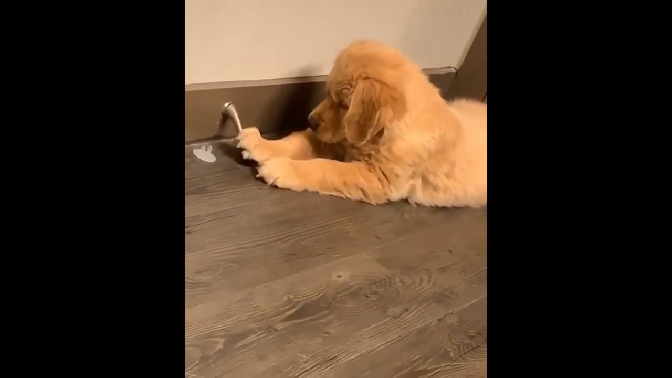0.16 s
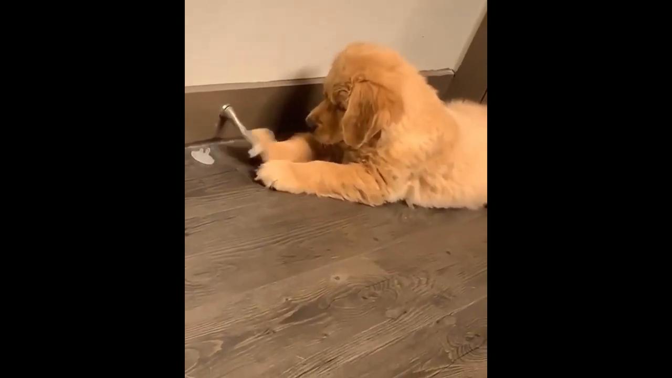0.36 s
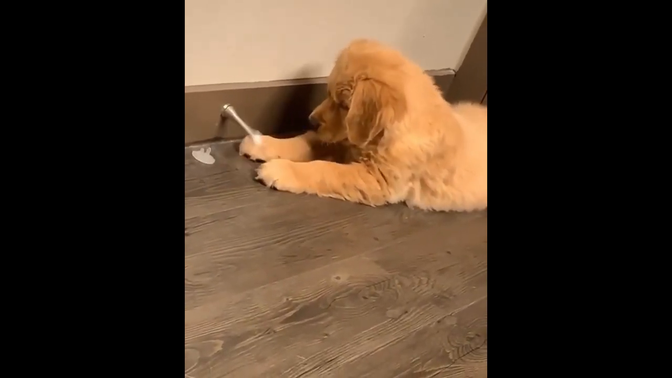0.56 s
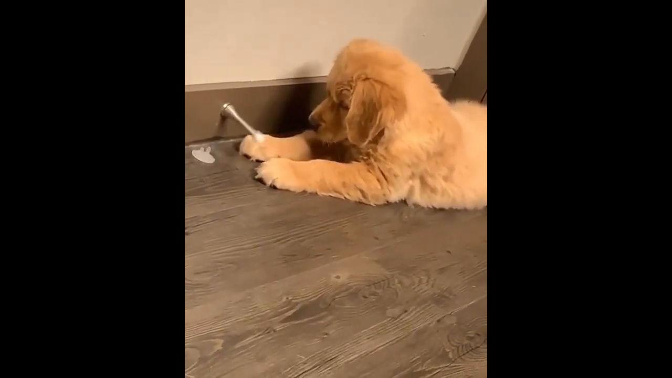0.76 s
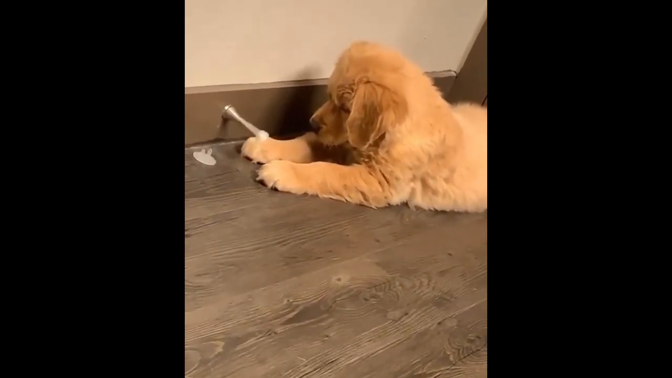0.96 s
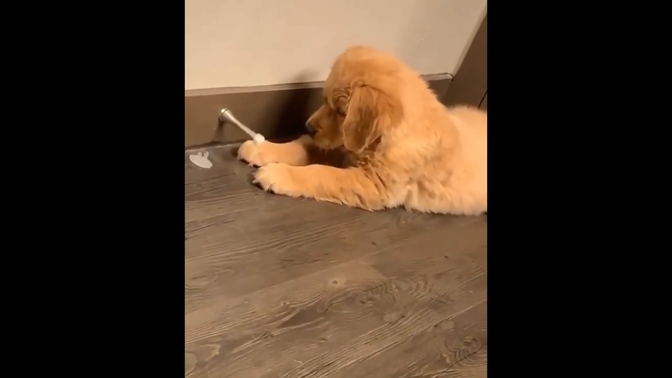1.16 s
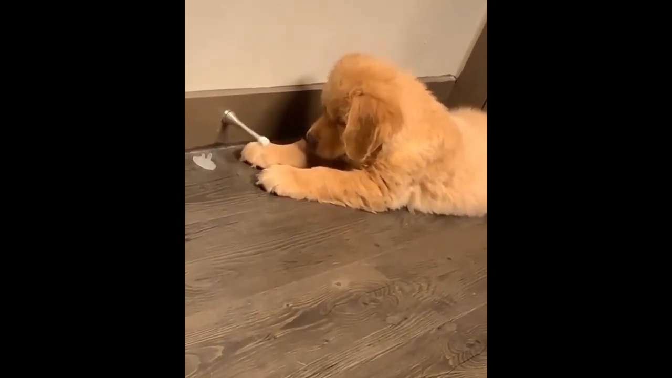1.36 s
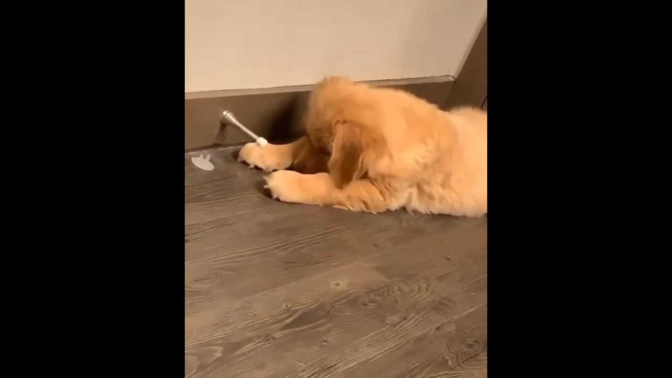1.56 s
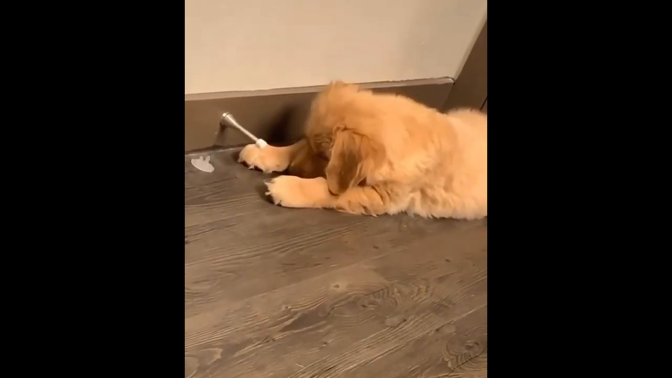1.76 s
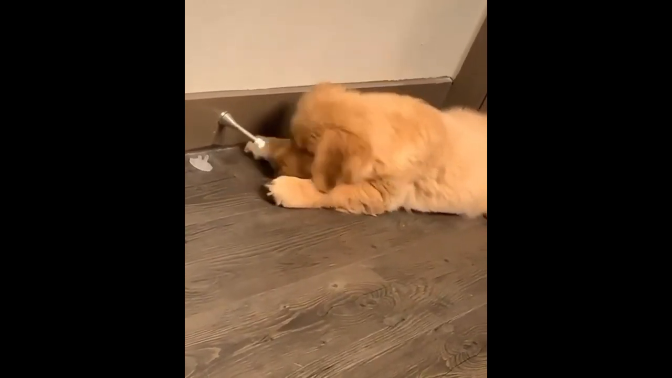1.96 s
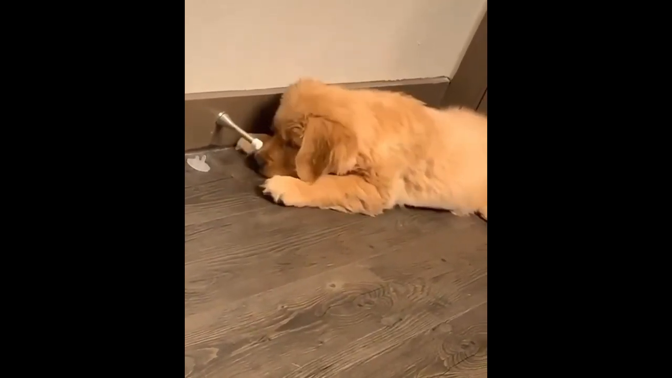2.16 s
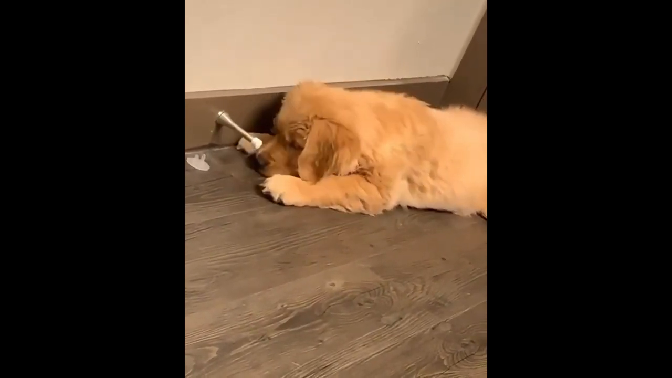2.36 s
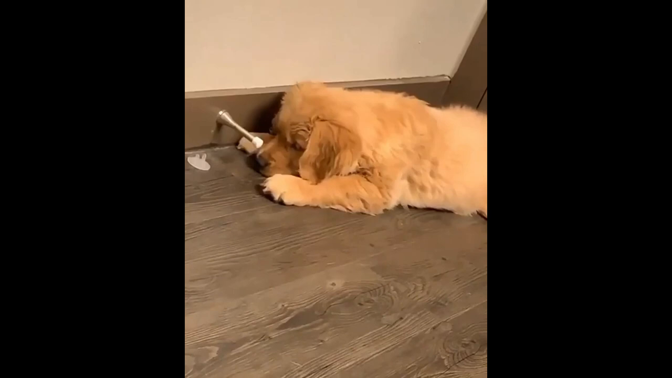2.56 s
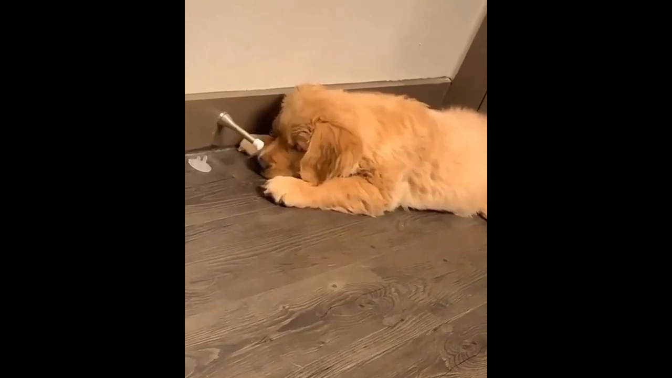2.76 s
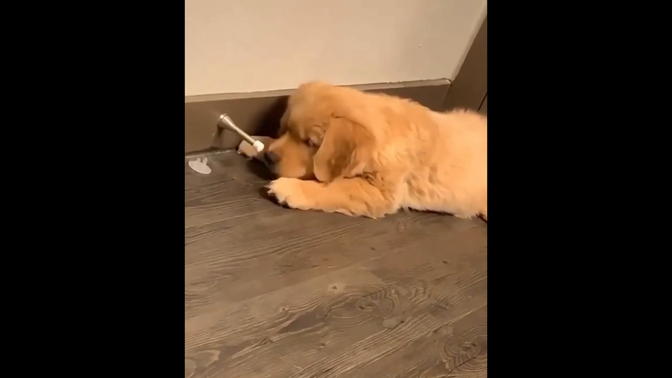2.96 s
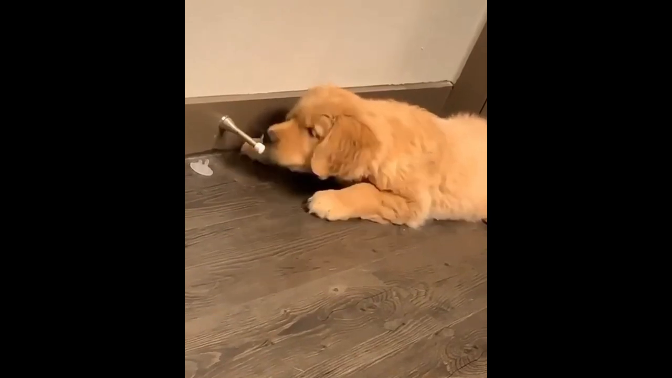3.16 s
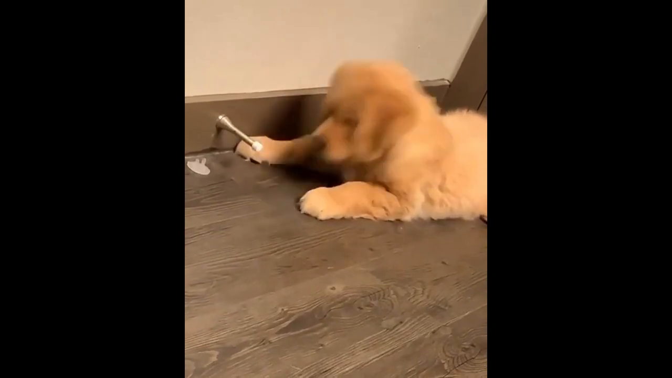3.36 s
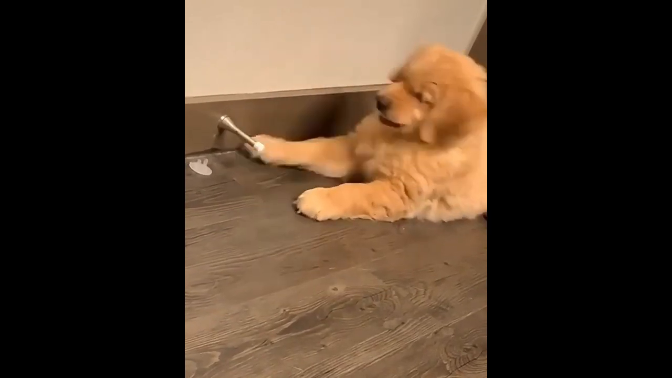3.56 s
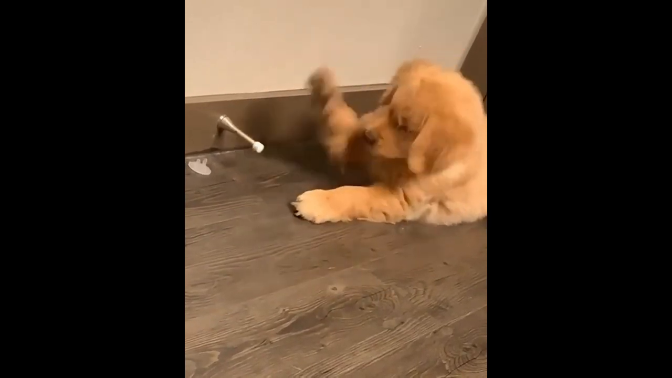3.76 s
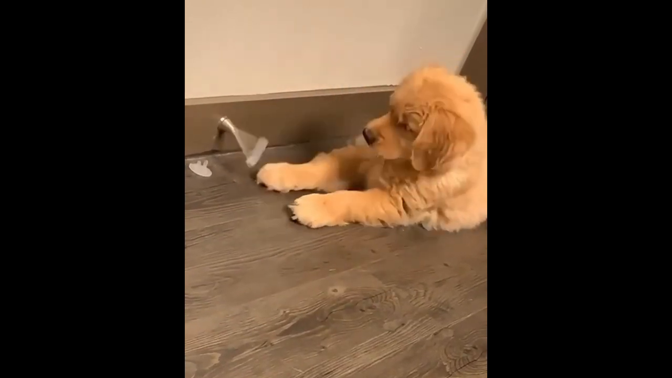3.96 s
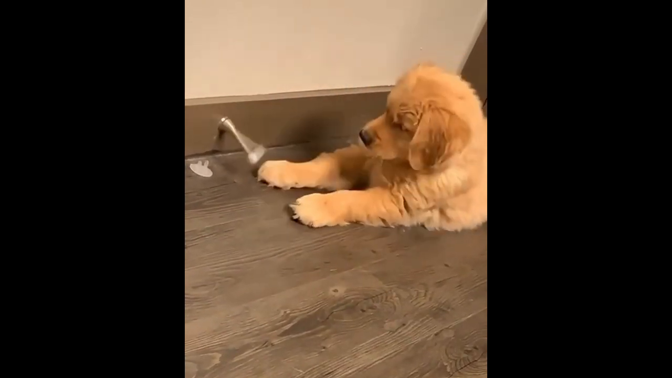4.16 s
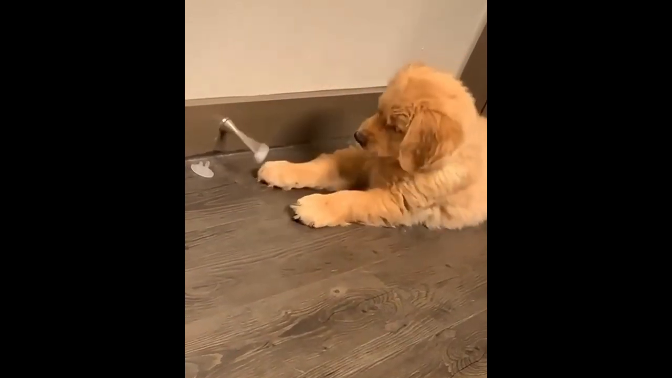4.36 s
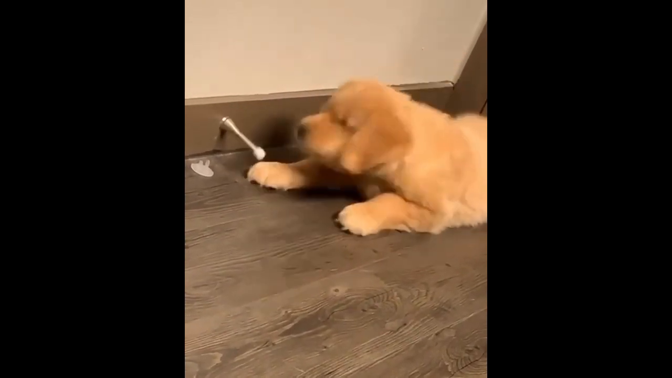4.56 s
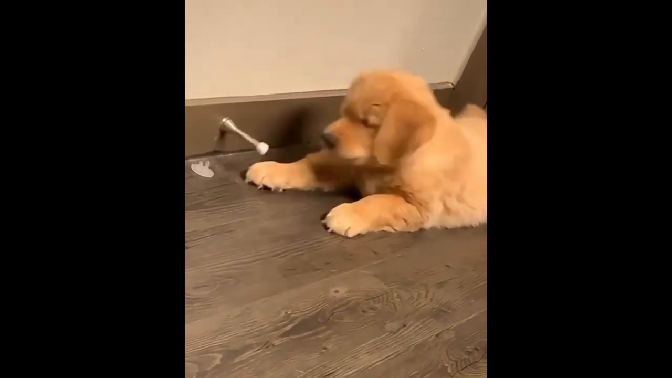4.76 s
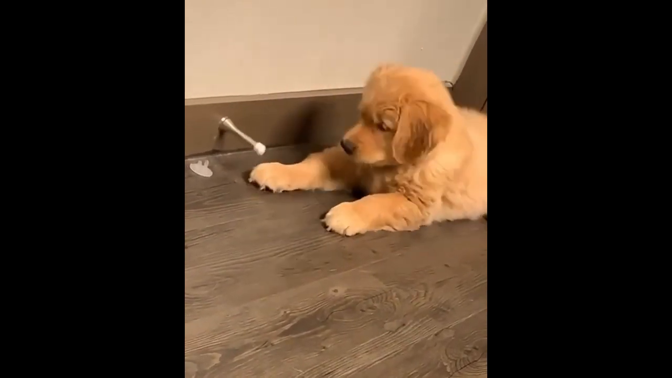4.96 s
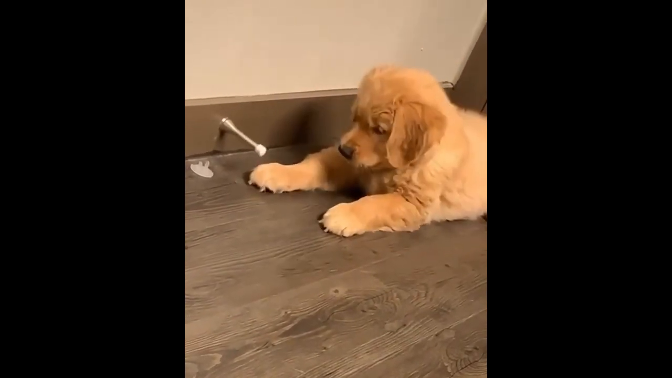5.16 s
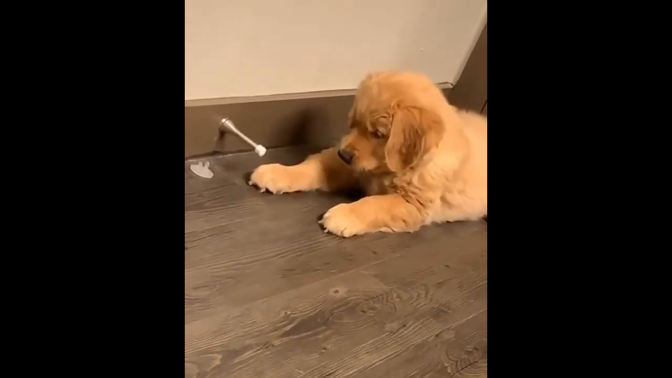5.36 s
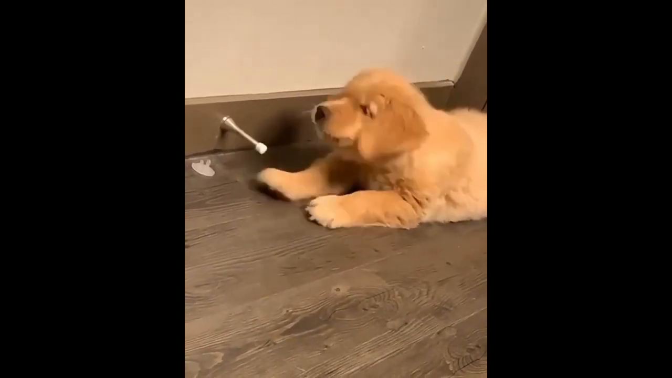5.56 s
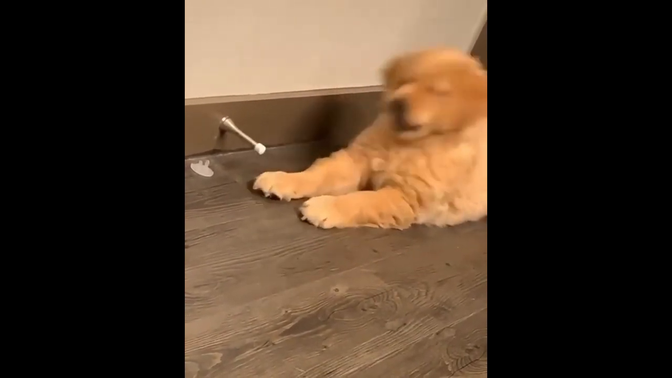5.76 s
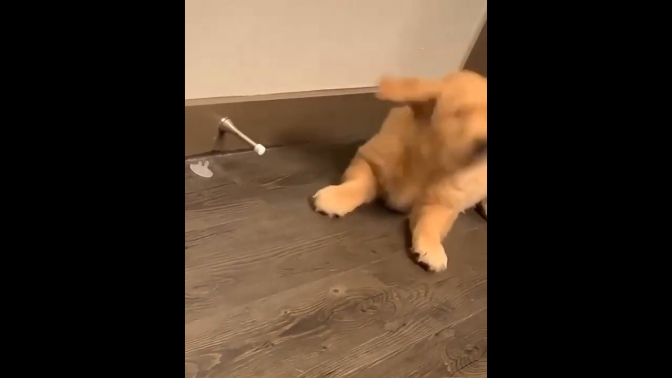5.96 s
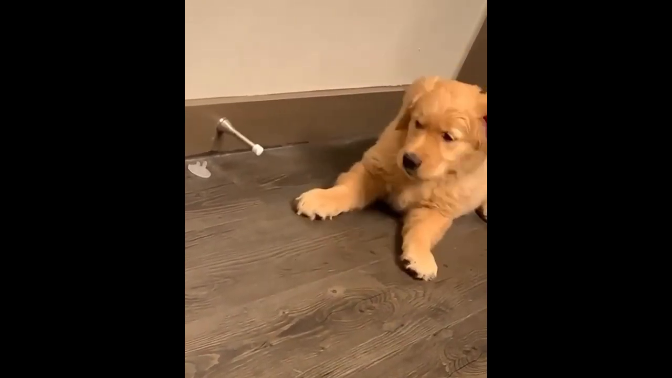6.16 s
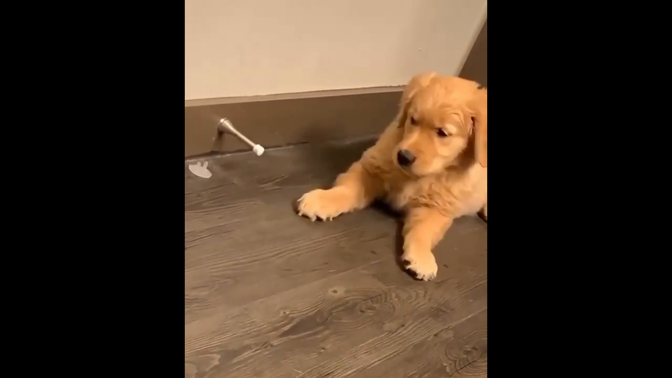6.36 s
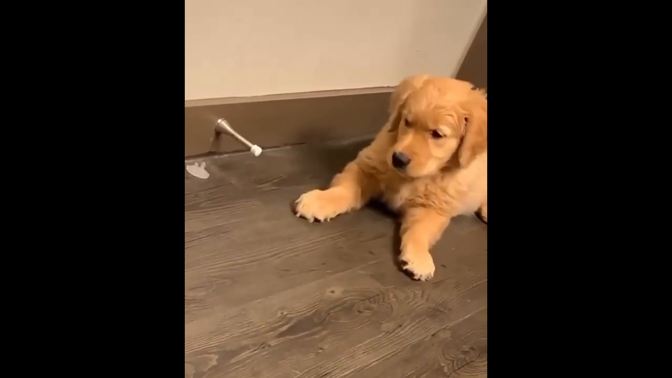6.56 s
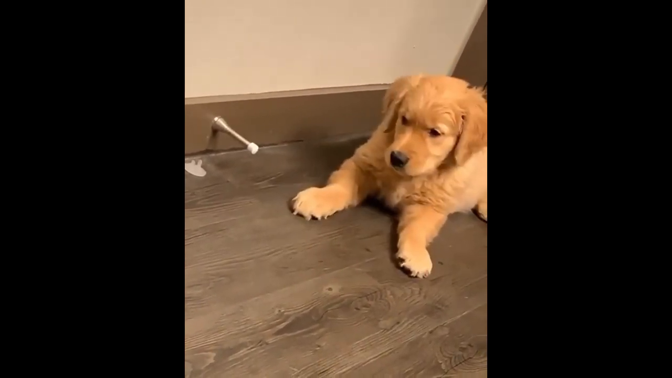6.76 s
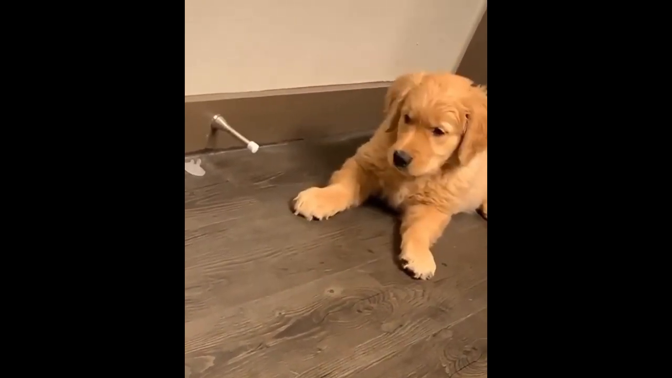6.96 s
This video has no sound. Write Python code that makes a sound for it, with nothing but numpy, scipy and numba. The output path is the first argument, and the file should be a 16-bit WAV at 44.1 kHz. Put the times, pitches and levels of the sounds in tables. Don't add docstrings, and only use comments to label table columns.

```python
import sys
import numpy as np
from scipy import signal
from scipy.fft import rfft, irfft
from scipy.io import wavfile
from scipy.ndimage import uniform_filter1d
from numba import njit

SR = 44100
rng = np.random.default_rng(int(sys.argv[2]) if len(sys.argv) > 2 else 0)


def convert_level_to_amplitude(level_db):
    exponent = np.asarray(level_db, float) / 20
    return 10 ** exponent


def log_audio(samples):
    frames = np.atleast_2d(samples).T
    limited = np.clip(frames, -1, 1)
    pcm = np.round(limited * 32767).astype(np.int16)
    wavfile.write(sys.argv[1], SR, pcm)


N = 308567

# start in
# seconds, peak in dB, treble in dB over the peak.
SLAPS = [(0.335, -50, -5), (0.374, -7.5, -38), (0.446, -10, -45), (0.67, -7.5, -29), (0.848, -29, -43),
         (1.009, -17.5, -27), (1.247, -21.5, -31), (1.361, -29, -20.5), (1.468, -30, -24),
         (1.569, -31.5, -26), (3.817, -33, -19), (3.87, -3.5, -38), (3.907, -5.5, -42), (3.95, -1, -23),
         (3.99, -10, -38), (4.041, -4.5, -33), (4.11, -9.5, -26), (4.376, -23, -25), (4.405, -22, -26),
         (4.443, -12, -40), (4.467, -11, -32), (4.525, -17, -30), (4.701, -14.5, -23), (4.739, -17, -26.5),
         (4.856, -19.5, -40), (4.899, -25.5, -34), (4.998, -24.5, -28), (5.109, -30, -30),
         (5.198, -36.5, -18), (5.468, -29, -24)]
# time in seconds, size of the swing in dB.
FLICKS = [
    [(0.372, -36.5), (1.2, -39.5), (1.57, -42), (1.97, -49), (2.14, -64), (2.3, -69)],
    [(3.868, -41), (4.34, -43), (4.7, -39), (5.07, -40), (5.39, -45), (5.56, -60), (5.72, -66)],
]
# start in seconds, rattle in dB, rise in seconds, hold in seconds, deep hum in dB.
CHATTERS = [(.38, -26.5, .004, .06, -38), (.645, -35, 0.011, .015, -28), (.676, -22, .004, .02, -29),
            (.83, -28, .025, .05, -43), (1.008, -33, .008, 0.026, -28.5), (1.247, -34, .004, .05, -25.5),
            (1.473, -44, 0.036, 0.018, -46), (3.826, -48, .008, .04, -36.5), (3.873, -21, .003, .1, -32.5),
            (3.994, -22.5, 0.033, .17, -27), (4.454, -26, 0.098, 0.023, -36.5),
            (4.503, -23, .04, 0.011, -35), (4.727, -28.5, .05, 0.022, -32),
            (4.905, -36.5, 0.057, 0.014, -37.5), (5.058, -43.5, 0.064, 0.024, -32.5),
            (5.394, -51.5, .05, .05, -48), (5.476, -44, .01, 0.014, -50.5)]
# centre in Hz, width in Hz, level in dB.
BOARD_DEEP = [
    (181.7, 11.4, 1),
    (207.8, 25, -5),
]
BOARD_LOW = [(280, 32, -1), (320.2, 26.7, -2), (341.4, 28, -6), (398.4, 45, -9.5)]
# centre in Hz, width in Hz, level in dB over the broad clatter.
BOARD_HIGH = [(577, 72, -1.5), (790.4, 32, 1), (946, 89, -5), (1084, 36, 0.5), (1206, 41, -5),
              (1345, 31, -7.5), (1792, 35, -4.5)]
# frequency in Hz, gain in dB.
CLATTER_COLOUR = [(200, -21.5), (450, -16), (800, -1), (1300, -.5), (1900, -5.5), (2600, -15), (3600, -19),
                  (5000, -27), (14000, -63.5)]
# frequency in Hz, gain in dB.
STEEL_COLOUR = [(2500, -10), (4500, -2), (7500, 0), (10500, -5), (12500, -13), (14000, -30)]


def door_stop():
    ticks = level(rng.standard_normal(N) * convert_level_to_amplitude(2.15 * rng.exponential(size=N)), 0)
    other_ticks = ticks[::-1]

    t = np.arange(int(0.2 * SR)) / SR
    slap = np.exp(-t / 0.02) + 0.51 * np.exp(-t / 0.0023)
    bursts = np.zeros((3, N))
    for s, db, treble_db in SLAPS:
        i = int(s * SR)
        thump_db = -17.5 + 0.65 * db
        bursts[:, i:i + len(t)] += convert_level_to_amplitude([[db], [db + treble_db], [thump_db]]) * slap
    slap_high, slap_treble, slap_thump = bursts

    swing = convert_level_to_amplitude(curves(FLICKS)[0])
    chatter = swells([(s, db, rise, hold, 0.1) for s, db, rise, hold, _ in CHATTERS])
    chatter_hum = swells([(s, db, rise, hold, 0.13) for s, db, rise, hold, _ in CHATTERS])
    chatter_deep = swells([(s - 0.016, deep_db, rise, hold, 0.24) for s, _, rise, hold, deep_db in CHATTERS])
    rattle = swing + chatter
    hum = convert_level_to_amplitude(1.5) * swing + convert_level_to_amplitude(-11.0) * chatter_hum
    deep = convert_level_to_amplitude(-4.5) * swing + chatter_deep

    swing_hz = 25.97
    knock, size, phase = pulses(np.full(N, swing_hz), 0.1 * walk(9), scatter_db=1.5)
    gate = size * (0.5 + np.exp(-(2 * phase % 1) / 0.33))

    high = (convert_level_to_amplitude(-5.0) * slap_high + convert_level_to_amplitude(3.0) * rattle * gate) * ticks
    treble = (convert_level_to_amplitude(-7.0) * slap_treble + convert_level_to_amplitude(-23.5) * rattle ** 0.94 * gate) * other_ticks
    thump = convert_level_to_amplitude(12.0) * slap_thump * ticks
    shake = convert_level_to_amplitude(40.5) * knock + convert_level_to_amplitude(19.0) * gate * ticks
    low = body(thump + convert_level_to_amplitude(1.0) * deep * shake, BOARD_DEEP)
    low = low + body(thump + convert_level_to_amplitude(-2.5) * hum * shake, BOARD_LOW)

    clatter = shaped(high + body(high, BOARD_HIGH), CLATTER_COLOUR)
    boom = shaped(low, [(60, -32.5), (125, -8.0), (165, 0.5), (380, 0.5), (500, -5.5), (1000, -38.0)])
    return clatter + boom + shaped(treble, STEEL_COLOUR)


# time in seconds, pitch in Hz, level in dB, roughness from 0 to 1.
YAP = [(5.762, 982, -47.5, 0.52), (5.778, 984.5, -13, 0.37), (5.79, 962.2, -6, .28), (5.82, 882, -4, 0.3),
       (5.85, 825.1, -4, .5), (5.89, 763.5, -4, .5), (5.94, 741.7, -4, 0.5), (5.995, 747.6, -6, 0.39),
       (6.008, 730, -36, 0.4)]
# start in seconds, level in dB, rise, hold and fall in seconds.
PUSH = (5.795, -29, .016, .04, .11)
# frequency in Hz, gain in dB.
THROAT = [(260, -36), (400, -13), (640, -6), (950, -2.5), (1250, -6.5), (1750, -10), (2050, -19.5),
          (2300, -14), (2650, -17.5), (3150, -17), (4200, -31.5), (4700, -50), (7000, -47), (13000, -66)]
# frequency in Hz, gain in dB.
TEETH = [(4500, -31), (6500, -15.5), (8000, 4), (10000, -1), (12500, -14), (14000, -28.5)]


def yap(count=8):
    hz, db, rough = curves([YAP])
    push = swells([PUSH])
    rough = np.clip(rough, 0, 1)
    _, size, phase = pulses(hz, 0.16 * rough * walk(250), scatter_db=3.0)
    partials = sum(np.cos(2 * np.pi * (k + 1) * phase) for k in range(count))
    folds = uniform_filter1d(size, size=30) * partials
    throb = 1 + 0.33 * np.cos(2 * np.pi * phase / 10.5 + 1.7 * walk(40))
    breath = 5.0 * rough * (1 + np.cos(2 * np.pi * phase)) * rng.standard_normal(N)
    source = throb * (folds + breath)

    voice = shaped(convert_level_to_amplitude(db - 0.5) * source, THROAT)
    gape = band(band(convert_level_to_amplitude(21.0) * push * source, 3150.0, 400.0), 3150.0, 730.0)
    hiss = push * convert_level_to_amplitude(3.0 * walk(120)) * coloured(TEETH)
    return voice + shaped(gape, [(4100, 0), (4600, -14)]) + hiss


# frequency in Hz, level in dB, time to fall 60 dB in seconds.
RINGING = [(730, 2.5, 0.46), (786, -3.5, 0.62), (846.6, 1, 0.49), (853, -3.5, .55), (896, 1, 0.63),
           (940, -8.5, 0.35), (1018, -8, 0.8), (1103, -7, 0.48), (1235, -2, .45), (1464, -10, 0.49),
           (1720, -1, 0.55), (1752, 0.5, 0.45), (2285, 0, 0.39), (3045, -3.5, 0.31)]


def ringing(bark):
    modes = []
    for hz, db, t60 in RINGING:
        width = np.log(1000) / np.pi / t60
        modes.append((hz, width, db + 13.0))
    return body(bark, modes)


# time in seconds, pulse rate in Hz, level in dB, mouth opening from 0 to 1.
GRUNTS = [
    [(5.468, 400, -46.5, 1), (5.505, 383.5, -40, 1), (5.58, 392, -54, 1), (5.69, 371, -56, 1)],
    [(5.71, 96.5, -40.5, 0.1), (5.735, 98.3, -23.5, 0.05), (5.77, 103.5, -17.5, 0), (5.82, 110.2, -12, 0),
     (5.87, 188, -31.5, 0.06), (5.93, 237, -31, 0.08), (5.97, 241.4, -50.5, 0)],
]


def grunts():
    hz, db, opening = curves(GRUNTS)
    pulse = convert_level_to_amplitude(db + 40.5) * pulses(hz, 0.066 * walk(60), scatter_db=0.5)[0]
    opening = opening.clip(0, 1)
    whimper = body(pulse * opening, [(400, 120, -3), (870, 89, -6), (1150, 110, -7), (1966, 450, -28)])
    whimper = shaped(whimper, [(1250, 0), (1600, -10), (5000, -12)])
    growl = shaped(pulse * (1 - opening), [(100, -37.5), (150, -20.5), (200, -7.5), (290, -8.0),
                                           (420, -8.5), (650, -49.0), (3000, -77.5)])
    return whimper + growl


# start in seconds, level in dB, rise, hold and fall in seconds.
SNIFFS = [(1.75, -75, .15, 0.092, .2), (1.96, -56.5, .15, 0.032, .15), (3.03, -65, 0.15, 0.027, 0.19),
          (3.37, -65.5, .1, 0.06, 0.054), (3.52, -65, .2, .05, 0.14), (5.43, -63, .04, .02, .05),
          (5.475, -54, .01, .04, .2)]
# frequency in Hz, gain in dB.
NOSE = [(880, -39), (1500, -5), (1970, -2.5), (2270, -0.5), (4770, -5), (7560, -7.5), (13000, -18.5)]


def sniffs():
    flutter = convert_level_to_amplitude(-2.5 + 2.2 * walk(50))
    return swells(SNIFFS) * flutter * coloured(NOSE)


# start in seconds, level in dB, time to fall 60 dB in seconds.
THUDS = [(.42, -47, 0.65), (.67, -48, .5), (3.4, -55, 1.4), (3.86, -43, .6), (4.45, -44, .5),
         (4.64, -43.5, .5), (5.471, -43, 0.33), (5.761, -51.5, .5)]


def paws():
    weight = np.zeros(N)
    t = np.arange(int(0.3 * SR)) / SR
    soft_start = np.clip(t / 0.037, 0, 1)
    for s, db, t60 in THUDS:
        weight[int(s * SR):][:len(t)] += convert_level_to_amplitude(db - 60 * t / t60) * soft_start
    return weight * coloured([(15, -7.5), (35, 4.5), (90, 5), (150, -14.0), (400, -37)])


# band centre in Hz, time to fall 60 dB in seconds.
ROOM = [(125, 0.72), (300, 0.62), (800, 0.6), (2000, 0.36), (5000, 0.58), (10000, 0.51)]


def room(x):
    t = np.arange(SR) / SR
    tail = sum(band(rng.standard_normal(SR), hz, 1.45 * hz) * convert_level_to_amplitude(-60 * t / t60) for hz, t60 in ROOM)
    tail = tail * np.clip(t / 0.0039, 0, 1)
    return signal.fftconvolve(x, tail / np.sqrt(np.sum(tail ** 2)))[:N]


# centre in Hz, width in Hz, level in dB.
HUMS = [
    (120.3, 2.5, -61),
    (467.3, 4.5, -65),
    (538, 9.7, -72.5),
    (606, 14, -74.5),
    (1200, 13, -80.5),
]
# start in seconds, level in dB, rise, hold and fall in seconds.
HUMS_ON = (0, 2, .1, 4, 1.5)
# start in seconds, level in dB, rise, hold and fall in seconds.
DRONE = [
    (0, -63, .1, 2.54, 0.56),
    (2.95, -58.5, .1, 0.42, .35),
]
# frequency in Hz, gain in dB.
VENTILATION = [(15, -12.5), (30, -4), (90, -2.5), (200, -14.5), (400, -12.5), (620, -25), (750, -20),
               (1300, -27), (3000, -33.5), (7000, -42.5), (13000, -52)]


def house():
    hums = [convert_level_to_amplitude(1.4 * walk(4.5)) * level(band(rng.standard_normal(N), hz, width), db) for hz, width, db in HUMS]
    mains, *upper = hums
    drone_hz = 218.0 + 2.0 * walk(6.1)
    drone = np.sin(2 * np.pi * np.cumsum(drone_hz) / SR)
    drone = swells(DRONE) * convert_level_to_amplitude(1.0 + 2.0 * walk(8.93)) * drone
    air = convert_level_to_amplitude(-58.5 + 0.6 * walk(1.2)) * coloured(VENTILATION)
    return air + mains + swells([HUMS_ON]) * sum(upper) + drone


def level(x, db):
    return x * convert_level_to_amplitude(db) / np.sqrt(np.mean(x ** 2))


def curves(tables, rest_db=-120):
    t = np.arange(N) / SR
    out = np.full((len(tables[0][0]) - 1, N), float(rest_db))
    for table in tables:
        s, *columns = np.transpose(table)
        on = (t >= s[0]) & (t <= s[-1])
        out[:, on] = [np.interp(t[on], s, c) for c in columns]
    return out


def swells(rows):
    t = np.arange(0, N / SR, 1 / 1000)
    total = np.zeros(len(t))
    for s, db, rise, hold, fall in rows:
        before = (s - t) / max(rise, 1e-3)
        after = (t - s - hold) / max(fall, 1e-3)
        total += convert_level_to_amplitude(db - 20 * np.maximum(before, after).clip(0, 9))
    return np.interp(np.arange(N) / SR, t, total)


def walk(rate):
    k = int(SR / rate)
    steps = np.repeat(rng.standard_normal(N // k + 1), k)
    return 1.3 * uniform_filter1d(uniform_filter1d(steps, k), k)[:N]


def pulses(hz, jitter, scatter_db):
    phase = np.cumsum(np.maximum(hz, 0) * (1 + jitter)) / SR
    size = convert_level_to_amplitude(scatter_db * rng.standard_normal(N // 20))[phase.astype(int)]
    return size * np.diff(np.floor(phase), prepend=0), size, phase


def band(x, hz, width):
    return signal.lfilter(*signal.iirpeak(hz, hz / width, SR), x)


def body(x, modes):
    return sum(convert_level_to_amplitude(db) * band(x, hz, width) for hz, width, db in modes)


def shaped(x, points, size=16384):
    hz, db = np.transpose(points)
    grid_hz = np.maximum(np.arange(size // 2 + 1) * SR / size, 1)
    cepstrum = irfft(np.interp(np.log(grid_hz), np.log(hz), db) * np.log(10) / 20)
    cepstrum[1:size // 2] *= 2
    cepstrum[size // 2 + 1:] = 0
    return signal.oaconvolve(x, irfft(np.exp(rfft(cepstrum)))[:size // 2])[:len(x)]


def coloured(points):
    return level(shaped(rng.standard_normal(N), points), 0)


def scene():
    bark = yap()
    near = door_stop() + grunts()
    echoes = convert_level_to_amplitude(-3.0) * room(near + convert_level_to_amplitude(-3.0) * bark)
    mix = near + echoes + convert_level_to_amplitude(-2.5) * bark + ringing(bark)
    return (mix + paws() + sniffs() + house())[None]


@njit
def follow(x, attack, release):
    out, e = np.empty(len(x)), 0.
    for i in range(len(x)):
        e += (abs(x[i]) - e) * (attack if abs(x[i]) > e else release)
        out[i] = e
    return out


def low_pass(x):
    return signal.sosfilt(signal.butter(12, 13820, fs=SR, output="sos"), x)


def record(dry):
    over_db = np.maximum(20 * np.log10(np.abs(dry[0]) + 1e-9) + 4.2, 0)
    attack_s, release_s = 0.0012, 0.9
    held = dry * convert_level_to_amplitude(-0.8 * follow(over_db, 1 / (attack_s * SR), 1 / (release_s * SR)))
    rounded = np.tanh(1.061 * held) / 0.91
    top = signal.ellip(8, 0.2, 60, 13250, fs=SR, output="sos")
    return low_pass(signal.sosfilt(top, rounded))


dry = scene()
out = record(dry)
log_audio(out)
```